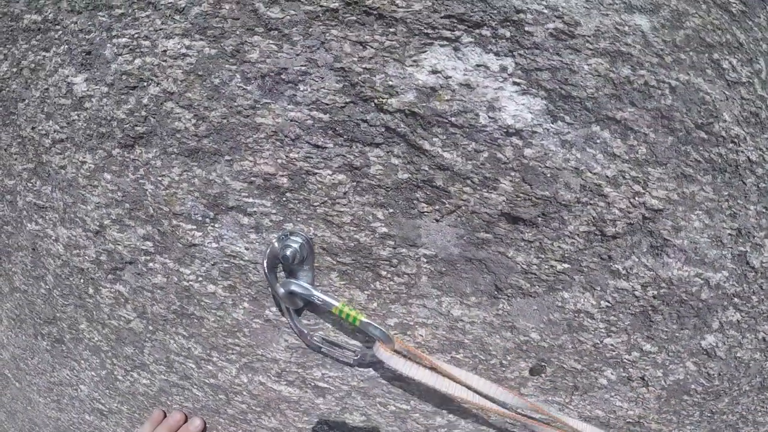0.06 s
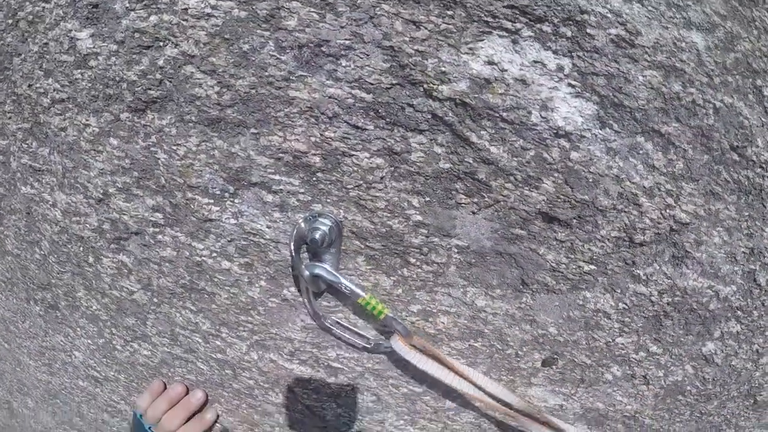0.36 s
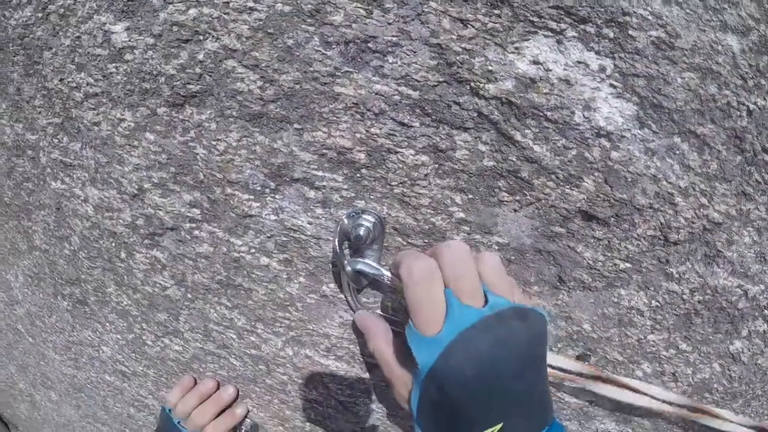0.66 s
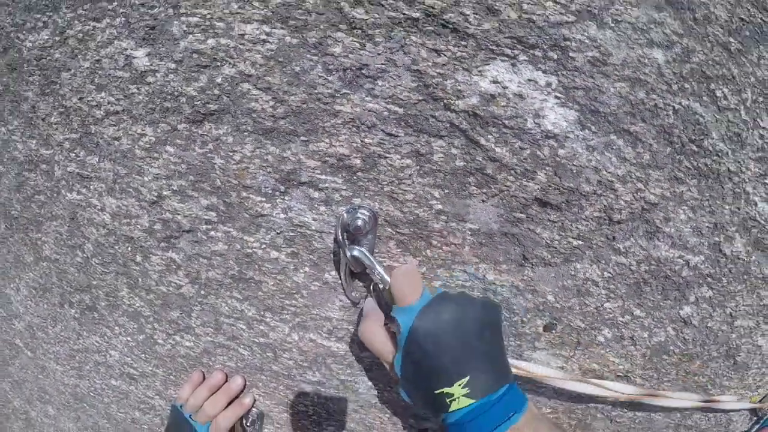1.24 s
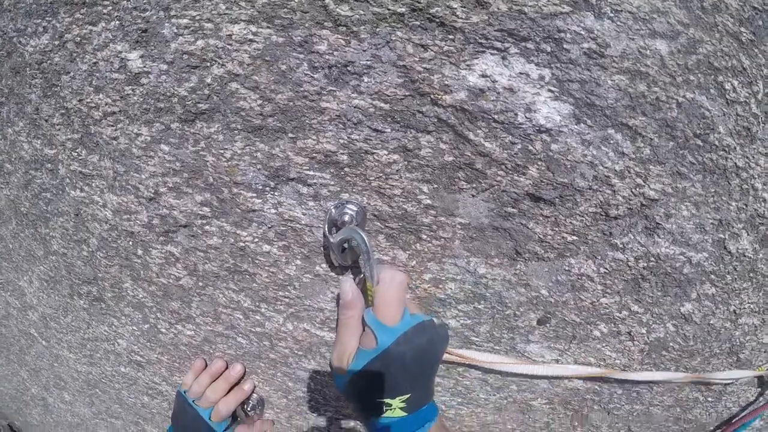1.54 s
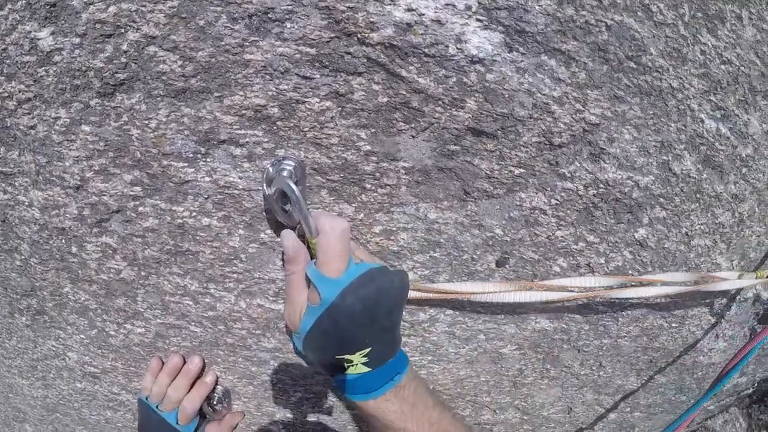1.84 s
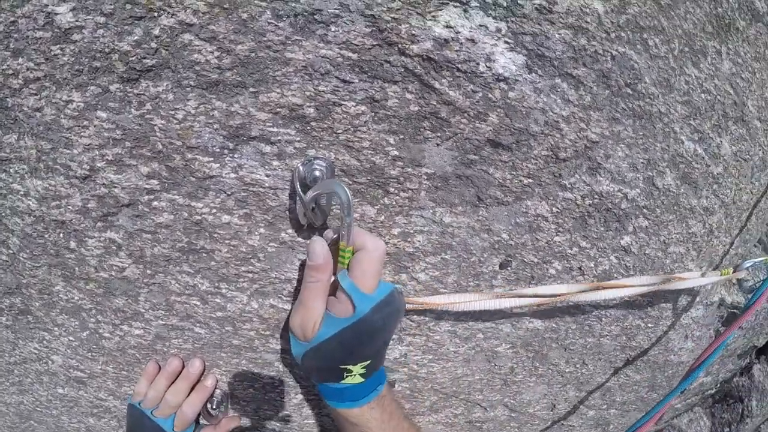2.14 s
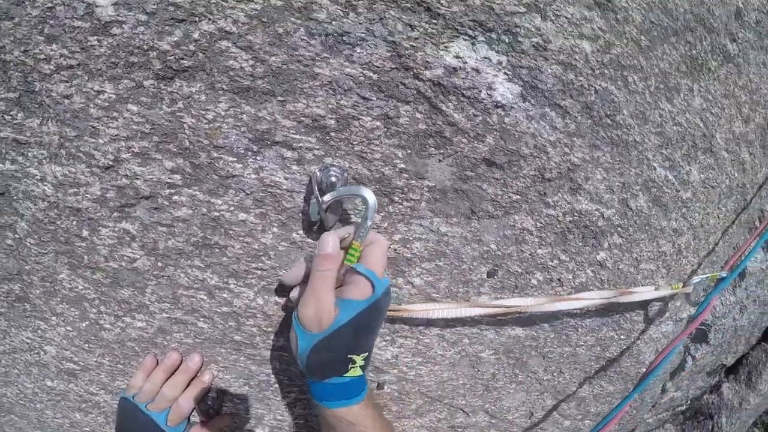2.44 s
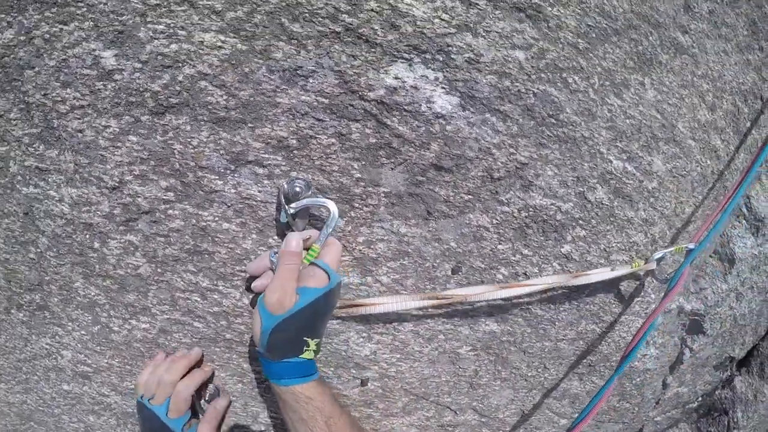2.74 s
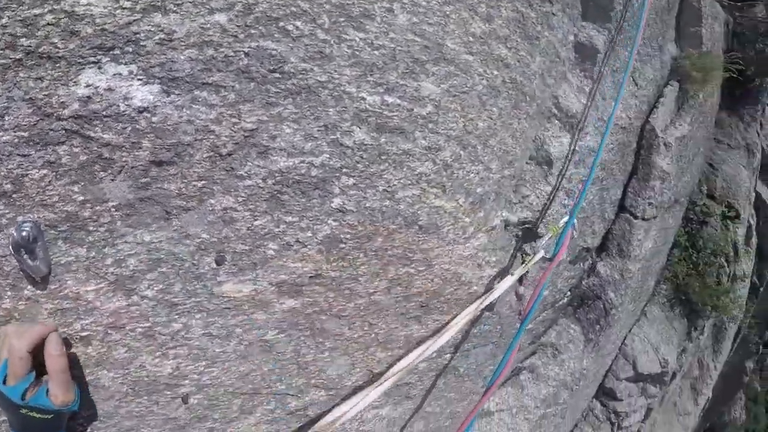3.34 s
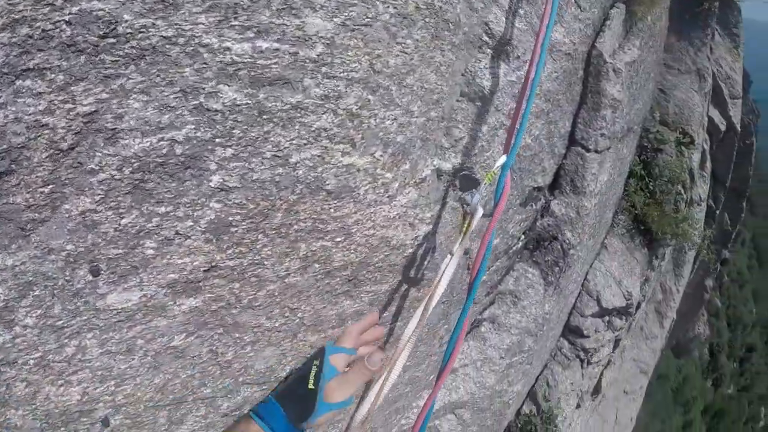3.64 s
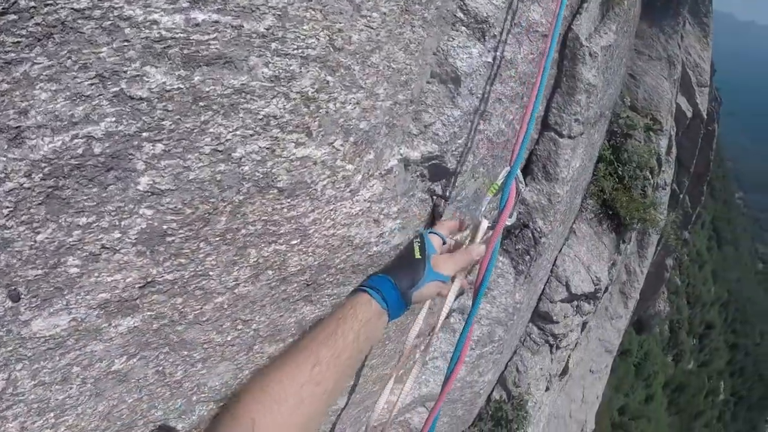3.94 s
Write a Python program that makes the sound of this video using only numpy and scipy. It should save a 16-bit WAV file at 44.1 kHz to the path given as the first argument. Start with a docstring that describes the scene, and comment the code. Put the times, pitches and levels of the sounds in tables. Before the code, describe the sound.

A metal carabiner clinks, scrapes and snaps shut, with wind buffeting the microphone.

```python
"""On a rock face, a body-worn stereo microphone close to a climber working a carabiner out of a bolt hanger.
The carabiner first swings and clinks freely, then scrapes, clacks and grinds in the hand; once it is off,
the sprung gate snaps shut. The wall scatters the metal's sound back. Hand and gear knock dully and the
sling slides; wind buffets both microphone ports over a faint outdoor hiss."""
import sys
import numpy as np
from scipy import signal
from scipy.fft import rfft, irfft, next_fast_len
from scipy.io import wavfile
from scipy.ndimage import uniform_filter1d, minimum_filter1d, map_coordinates

SR = 44100
rng = np.random.default_rng(int(sys.argv[2]) if len(sys.argv) > 2 else 0)


def store_pcm(level_fs):
    """Save levels as 16-bit WAV."""
    pcm = np.round(np.clip(level_fs, -1, 1) * 32767).astype(np.int16)
    wavfile.write(sys.argv[1], SR, np.atleast_2d(pcm).T)


N = 176400
METAL_RISE_S, DULL_RISE_S = 0.00033, 0.0019

# likeness of the wind at the two ports (frequency [Hz], left-right correlation)
WIND_ALIKE = [(30, -0.33), (70, -0.1), (130, 0.25), (250, -0.26), (500, -0.79), (1200, -0.95)]
# spectra of soft and of sharp wind on a port (frequency [Hz], level [dB])
SOFT_WIND = [(40, 1), (80, -0.5), (120, 1), (200, -2), (300, -8.5), (500, -22.5), (800, -41.5), (1500, -57),
             (4000, -81)]
SHARP_WIND = [(60, -3), (120, -0.5), (240, -0.5), (400, -4.5), (600, -13.5), (900, -23.5), (1500, -39.5),
              (4000, -110)]
# spectrum of rubbed metal (frequency [Hz], level [dB])
SCRAPE_COLOUR = [(400, -23), (1300, 1.5), (2500, -1), (5200, 4), (7500, 2), (9200, 3), (10500, -29),
                 (15000, -66)]


def amp(db):
    """Decibels to gain."""
    return 10 ** (np.asarray(db) / 20)


def unit(x):
    """Scaled to rms 1."""
    return x / np.sqrt(np.mean(x ** 2) + 1e-20)


def along(points, hz):
    """(frequency [Hz], value) points read on a log axis."""
    f, v = np.transpose(points)
    return np.interp(np.log(hz + 1), np.log(f + 1), v)


def curves(rows):
    """One value per sample for each column after the time."""
    s, *cols = np.transpose(rows)
    return [np.interp(np.arange(N) / SR, s, c) for c in cols]


def wobble(rate):
    """A smooth random curve, rate knots a second."""
    return map_coordinates(rng.standard_normal(int(N * rate / SR) + 4), [np.arange(N) * rate / SR])


def filtered(x, response):
    """x shaped by a frequency response."""
    n = x.shape[-1]
    m = next_fast_len(n + 8192)
    return irfft(rfft(x, m) * response(np.fft.rfftfreq(m, 1 / SR)), m)[..., :n]


def panned(db):
    """Left and right gains with a mean of 1 for a left-right difference."""
    g = np.atleast_1d(amp(db))
    return np.array([2 * g, 2 * np.ones_like(g)]) / (1 + g)


def add(track, s, sound):
    """Mix a sound into the track at time s."""
    part = track[:, max(round(s * SR), 0):][:, :sound.shape[-1]]
    part += sound[..., :part.shape[-1]]


def blend(a, b, share):
    """Equal-power mix from a to b."""
    return np.sqrt(1 - share) * a + np.sqrt(share) * b


def rush(colour, alike=WIND_ALIKE):
    """Stereo noise of rms 1 with a given spectrum and left-right correlation."""
    def response(hz):
        angle = np.arccos(along(alike, hz)) / 2
        return amp(along(colour, hz)) * [np.cos(angle), np.sin(angle)]
    mid, side = filtered(rng.standard_normal((2, N)), response)
    return unit(np.array([mid + side, mid - side]))


def wind():
    """Moving air on the microphone ports: a deep rumble and a light, wavering breeze."""
    # course of the rumble (time [s], level [dB], left-right [dB])
    rumble_course = [(0, -21, -9.5), (.45, -22.5, -9.5), (.95, -17.5, -10), (1.15, -19.5, -7),
                     (1.6, -17, -9.5), (1.9, -24, -10.5), (2.47, -16, -13.5), (2.65, -15.5, 9.5),
                     (3, -18, -9), (3.32, -16.5, -2), (3.5, -21, 1.5), (4, -16.5, -1.5)]
    # its spectrum (frequency [Hz], level [dB])
    rumble_colour = [(22, -2.5), (36, -5), (70, -2), (120, -9), (200, -20), (400, -40.5), (1000, -84.5)]
    breeze_side = [(0, -4.5), (2.45, -8), (2.651, -5), (4, 15)]  # (time [s], left-right [dB])
    level_db, pan_db = curves(rumble_course)
    rumble = amp(level_db) * panned(pan_db) * rush(rumble_colour)
    breeze = amp(-30 + 3.3 * wobble(rate=14)) * panned(curves(breeze_side)[0]) * rush(SOFT_WIND)
    return rumble + breeze


def outdoor_hiss():
    """Faint outdoor hiss, duller near the end, ducked by the gain control in the last strong gust."""
    # spectrum of the hiss (frequency [Hz], level [dB])
    colour = [(500, 0.5), (1000, -3.5), (3000, -16.5), (4600, -23), (7000, -19), (9500, -25),
              (13000, -36.5), (15500, -61.5)]
    # its likeness at the two ports (frequency [Hz], left-right correlation)
    alike = [(1500, 0.058), (5000, 0.26), (10000, 0.067)]
    # hiss level, with the dip of the recorder's gain control drawn in at 3.82 s (time [s], level [dB])
    levels = [(0, -40.5), (.8, -42), (1.8, -44), (3.72, -43), (3.82, -47), (4, -44)]
    treble_hz, treble_course = 5360, [(3.33, 0.5), (3.45, -3)]  # lower edge; (time [s], gain [dB])
    (level_db,), (treble_db,) = curves(levels), curves(treble_course)
    hiss = rush(colour, alike)
    treble = filtered(hiss, lambda hz: hz > treble_hz)
    return amp(level_db) * (hiss + (amp(treble_db) - 1) * treble)


def gusts(edge_s=0.029, flutter_hz=45.17, flutter_db=1.5):
    """Gusts swell and flutter across the ports."""
    # each gust (start [s], length [s], level [dB], sharpness [0-1], left-right [dB])
    puffs = [(0.058, 0.031, -17.5, 0, -26), (0.769, 0.18, -21, 0, -13.5), (0.917, 0.17, -16.5, 0.42, -7),
             (1.064, 0.155, -18.5, 0.06, -4), (1.214, 0.27, -18.5, 0.23, -6),
             (1.523, 0.26, -22, 0.07, -6.5), (2.081, 0.049, -19.5, 0.44, -12), (2.566, .16, -20, 0.06, 2.5),
             (3.172, 0.056, -23, 0.02, -3), (3.264, 0.16, -16.5, 0.11, 6), (3.408, 0.13, -17.5, 0.05, 9.5),
             (3.664, 0.15, -18, 0.04, 7), (3.754, 0.2, -11.5, 0.92, 7)]
    out, t = np.zeros((2, N)), np.arange(N) / SR
    soft, sharp = rush(SOFT_WIND), rush(SHARP_WIND)
    flutter = amp(flutter_db * wobble(flutter_hz))
    for s, length, db, sharpness, pan_db in puffs:
        swell = np.clip(np.minimum(t - s, s + length - t) / edge_s, 0, 1)
        out += amp(db) * panned(pan_db) * swell * flutter * blend(soft, sharp, sharpness)
    return out


def blow(modes, crack_db, bright_db=0, crack_t60=0.024, scatter_db=3):
    """Metal hits metal: decaying modes and a noisy crack, tilted bright_db an octave about 6 kHz."""
    # spectrum of the crack (frequency [Hz], level [dB])
    crack_colour = [(300, 4.5), (1000, 3.5), (2000, 1), (3000, 7.5), (6500, 12.5), (9000, 6.5),
                    (11000, -7.5), (16000, -30.5)]
    t = np.arange(SR // 5) / SR
    hz, db, t60 = np.transpose(modes)[:, :, None]
    tilt = lambda f: bright_db * np.log2(np.maximum(f, 2000) / 6000)
    gain = amp(db + tilt(hz) + scatter_db * rng.uniform(-0.86, 1, hz.shape))
    phase = 2 * np.pi * (hz * t + rng.random(hz.shape))
    ring = np.sum(gain * amp(-60 * t / t60) * np.sin(phase), 0) / np.linalg.norm(gain)
    crack = unit(filtered(rng.standard_normal(len(t)), lambda f: amp(along(crack_colour, f) + tilt(f))))
    return (ring + amp(crack_db - 60 * t / crack_t60) * crack) * (1 - np.exp(-t / METAL_RISE_S))


def clinks():
    """The carabiner swings on the hanger and rings freely."""
    # swings against the hanger (time [s], level [dB])
    hits = [(0.0877, -31.5), (0.1012, -25.5), (0.1029, -20), (0.1418, -28)]
    # modes of the dangling carabiner (frequency [Hz], level [dB], t60 [s])
    modes = [(4650, -5, .036), (5010, -1, .032), (5500, -3, .034), (5950, -7, .025), (9055, -9, .06),
             (11420, -23, .05)]
    out = np.zeros((1, N))
    for s, db in hits:
        add(out, s, amp(db) * blow(modes, crack_db=-11.5))
    return out


def rock(x, level_db=-12, t60=0.045, delay_s=0.003):
    """A brief diffuse answer from the rough wall close by."""
    t = np.arange(SR // 5) / SR
    tail = rng.standard_normal((2, len(t))) * amp(-60 * t / t60) * (t > delay_s)
    return amp(level_db) * signal.fftconvolve(x, tail / np.linalg.norm(tail[0]), axes=1)[:, :N]


def slips(per_s=420, spread_db=5, rubbing=0.35):
    """The force of sliding metal: tiny slips of uneven size over a little smooth rubbing."""
    slipping = rng.random(N) < per_s / SR
    size = amp(spread_db * np.minimum(rng.exponential(size=N), 3))
    jerks = slipping * size * rng.choice([-1, 1], N)
    return unit(unit(jerks) + rubbing * rng.standard_normal(N))


def scrapes(rise_share=0.23):
    """Light sliding over rock and hanger swells and fades with each stroke and excites the metal."""
    # strokes (start [s], length [s], level [dB])
    strokes = [(0.112, 0.066, -46), (0.2, 0.093, -44), (0.31, 0.12, -46), (0.42, 0.086, -45),
               (0.479, 0.15, -35), (0.98, 0.11, -48), (1.054, 0.088, -47.5), (1.572, 0.24, -51.5),
               (1.95, 0.078, -48.5), (2.253, 0.099, -45), (2.755, 0.1, -44.5)]
    # resonances of the sliding metal (frequency [Hz], width [Hz], level [dB])
    rings = [(2310, 35, 19), (2730, 40, 8), (4950, 70, 14), (5540, 70, 13), (6170, 45, 18), (7020, 50, 13)]

    def body(f):
        peaks = sum(amp(db) * 1j * f * w / (hz * hz - f * f + 1j * f * w) for hz, w, db in rings)
        return amp(along(SCRAPE_COLOUR, f)) + peaks
    t = np.arange(N) / SR
    level = sum(amp(db) * np.interp((t - s) / length, [0, rise_share, 1], [0, 1, 0])
                for s, length, db in strokes)
    force = slips()
    return filtered(force * level, body) / np.std(filtered(force, body))


def contacts():
    """Each touch on the hanger clacks; the grip decides which note rings on, and for how long."""
    # touches (time [s], clack [dB], brightness [dB/octave], note [Hz], note level [dB], note t60 [s])
    touches = [ (0.157, -34, 1, 6980, -35, 0.078), (0.203, -37, 11, 7600, -42, 0.12),
               (0.332, -36.5, 0, 5000, -39.5, 0.059), (0.44, -35.5, -12, 4950, -57, .05),
               (0.496, -37, -16, 5500, -40, .02), (0.505, -29.5, -6.5, 5830, -25, 0.024),
               (.607, -42, 0, 4950, -39, 0.045), (.733, -38, -5, 6100, -42, .02),
               (.897, -26.5, 8, 7090, -27.5, 0.1), (0.971, -25.5, -3.5, 6050, -36, 0.043),
               (1.033, -32, -3, 2937, -51.5, 0.42), (1.08, -37, -3, 2360, -45.5, 0.12),
               (1.09, -32, 6, 5577, -44.5, 0.16), (1.203, -40, -3, 5600, -56, .1),
               (1.245, -34, -6, 5500, -44, 0.037), (1.310, -24.5, 2.5, 6510, -18, 0.026),
               (1.338, -34, 9, 8350, -33, 0.027), (1.372, -35.5, -5, 6450, -22.5, 0.025),
               (1.4118, -26.5, 1.5, 7650, -3, 0.0037), (1.473, -31.5, 0.5, 6150, -44, 0.018),
               (1.53, -46, 11, 6960, -36.5, 0.064), (1.98, -28.5, -3.5, 6030, -21, 0.0095),
               (2.0247, -23.5, 1, 6300, -23, 0.01), (2.082, -33, -6, 5200, -32, 0.011),
               (2.339, -16, 4, 5500, -21, 0.017), (2.376, -26, -2.5, 6190, -16.5, 0.026),
               (2.403, -28, -4.5, 6270, -16.5, 0.016), (2.609, -39, -8, 6100, -26.5, 0.012),
               (2.794, -42, -6, 6130, -30.5, 0.11), (2.805, -33, -4, 6130, -27, 0.052),
               (2.843, -26.5, 0.5, 6170, -8, 0.017), (2.8427, -41, 15, 5200, -30, 0.064),
               (2.845, -38, -5, 6190, -30, 0.11), (3.023, -35, -11, 4870, -39, .02)]
    # modes of the heavily damped hanger (frequency [Hz], level [dB], t60 [s])
    modes = [(2690, 3, 0.013), (3390, 4, 0.011), (3920, -13.5, 0.04), (4570, -6, 0.037), (5550, 11, 0.011),
             (6760, 7.5, 0.023), (8030, -9, 0.022), (9040, 2, 0.022), (9800, -1.5, 0.019),
             (14200, -30, .012)]
    out, t = np.zeros((1, N)), np.arange(SR // 5) / SR
    rise = 1 - np.exp(-t / METAL_RISE_S)
    for s, db, bright_db, note_hz, note_db, t60 in touches:
        note = amp(note_db - 60 * t / t60) * np.sin(2 * np.pi * note_hz * t) * rise
        add(out, s, amp(db) * blow(modes, crack_db=-2.5, bright_db=bright_db) + note)
    return out


def thumps(t60=0.052):
    """Short dull thumps of wind at the ports."""
    # each thump (time [s], level [dB], reach into the treble [0-1], left-right [dB])
    buffets = [(.302, -20, 0.06, -4), (0.965, -12, 0, -3.5), (1.003, -14, 0.4, -1),
               (1.034, -4.5, 0.23, 1.5), (3.297, -13, 0, 4.5), (3.347, 0.5, 0.02, 0.5)]
    # spectrum of the hardest buffeting (frequency [Hz], level [dB])
    colour = [(80, -20), (200, 2), (650, 3.5), (980, -8.5), (1500, -9), (8000, -64)]
    out, t = np.zeros((2, N)), np.arange(N) / SR
    sharp, hard = rush(SHARP_WIND), rush(colour)
    for s, db, reach, pan_db in buffets:
        age = np.maximum(t - s, 0)
        level = amp(db - 60 * age / t60) * (1 - np.exp(-age / DULL_RISE_S))
        out += level * panned(pan_db) * blend(sharp, hard, reach)
    return out


def knocks(t60=0.025, grit_db=-7):
    """Hand and gear knock on the rock: a quickly damped tone with some grit."""
    # each knock (time [s], level [dB], pitch [Hz])
    hits = [(1.003, -30.5, 1210), (1.033, -18.5, 622), (1.477, -20, 926), (3.348, -19, 415)]
    out, t = np.zeros((1, N)), np.arange(SR // 10) / SR
    for s, db, hz in hits:
        band = lambda f: f * hz / (hz * hz + f * f) / (1 + (f / hz / 2) ** 2)
        grit = unit(filtered(rng.standard_normal(len(t)), band))
        sound = np.sin(2 * np.pi * hz * t) + amp(grit_db) * grit
        add(out, s, amp(db - 60 * t / t60) * (1 - np.exp(-t / DULL_RISE_S)) * sound)
    return out


def grinds(climb=0.02, waver=0.014, waver_hz=120, rasp_share=0.2):
    """Pressed into the hanger, the carabiner rasps; its notes climb and waver as the contact moves."""
    # presses (start [s], length [s], level [dB], pitch [ratio])
    presses = [(1.251, 0.084, -42.5, .985), (1.371, 0.045, -38, 1.02)]
    # resonances of the pressed metal (frequency at ratio 1 [Hz], width [Hz], level [dB])
    rings = [(2144, 155, -1), (2810, 69, -6), (4220, 74, -4.5), (5260, 100, 3), (6450, 78, 10.5),
             (8700, 190, -12.5)]
    out, t = np.zeros(N), np.arange(N) / SR
    for s, length, db, pitch in presses:
        progress = np.clip((t - s) / length, 0, 1)
        force = slips() * np.sqrt(np.abs(np.sin(np.pi * progress)))
        warped_time = np.cumsum(pitch + climb * progress + waver * wobble(waver_hz)) / SR
        ring = np.zeros(N)
        for hz, width_hz, mode_db in rings:
            spin = np.exp(2j * np.pi * hz * warped_time)  # carries a one-pole filter to the moving note
            pole = np.exp(-np.pi * width_hz / SR)
            ring += amp(mode_db) * np.real(spin * signal.lfilter([1 - pole], [1, -pole], force / spin))
        rasp = filtered(force, lambda f: amp(along(SCRAPE_COLOUR, f)))
        sound = blend(unit(ring), unit(rasp), rasp_share)
        out += amp(db) * sound * np.sqrt(length * SR) / np.linalg.norm(sound)
    return out


def gate():
    """The sprung gate hits the nose of the carabiner and chatters once."""
    # hits on the nose (time [s], level [dB])
    snaps = [(3.0669, -5.5), (3.0678, 4)]
    # modes of the closing gate (frequency [Hz], level [dB], t60 [s])
    modes = [(2720, -8, .016), (3100, -11, .011), (5070, -8, .018), (6130, -25, .11), (6150, -7, .011),
             (6750, -6, .01), (7780, -.5, .014), (8680, 5, .013), (9900, -12, .01), (11320, -14, .016),
             (12610, -14, .009), (14110, -15, .008)]
    out = np.zeros((1, N))
    for s, db in snaps:
        add(out, s, amp(db) * blow(modes, crack_db=-20.5))
    return out


def sling(start_s=3.38, length_s=0.42, level_db=-65, hz=4760, width_hz=300):
    """The sliding sling gives a faint, narrow swish."""
    swell = np.sin(np.pi * np.clip((np.arange(N) / SR - start_s) / length_s, 0, 1))
    swish = filtered(rng.standard_normal((2, N)), lambda f: 1 / (1 + ((f - hz) / width_hz) ** 2))
    return amp(level_db) * swell * unit(swish)


def scene(rub_top_hz=12000):
    """The metal within arm's reach of the microphone, the rock just behind it, wind on the ports."""
    # where the carabiner hangs before the microphone (time [s], left-right [dB])
    place = [(.1, 5), (.25, -4.5), (.6, -8.5), (.9, 6), (1.4, 2.5), (2.3, 4.5)]
    # the right port is brighter (frequency [Hz], left-right [dB])
    port_tilt = [(2000, -4.5), (6200, -1.5), (7300, -16), (9500, -23.5), (11000, -13), (15000, -1.5)]
    rubbing = filtered(scrapes() + grinds(), lambda hz: 1 / (1 + (hz / rub_top_hz) ** 10))
    metal = (clinks() + contacts() + gate() + rubbing) * panned(curves(place)[0])
    metal = filtered(metal, lambda hz: panned(along(port_tilt, hz)))
    return wind() + outdoor_hiss() + gusts() + metal + rock(metal) + thumps() + knocks() + sling()


def record(dry, ceiling=0.95, hold_s=0.081, top_hz=16400):
    """The recorder's limiter ducks briefly at the loudest peaks; nothing is kept above top_hz."""
    needed_gain = np.minimum(1, ceiling / (np.abs(dry).max(0) + 1e-9))
    hold, ahead = 2 * int(hold_s * SR / 2) + 1, 40  # samples
    held_gain = minimum_filter1d(needed_gain, hold, origin=hold // 2 - ahead)
    return filtered(dry * uniform_filter1d(held_gain, ahead), lambda hz: hz < top_hz)


dry = scene()
out = record(dry)
store_pcm(out)
```